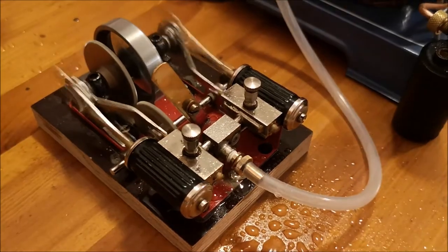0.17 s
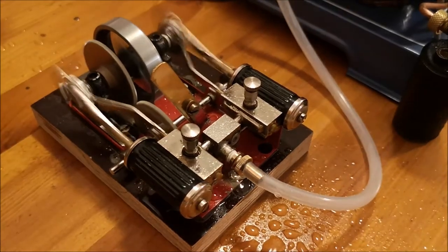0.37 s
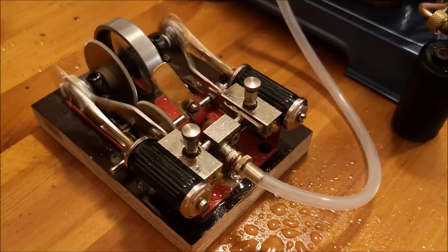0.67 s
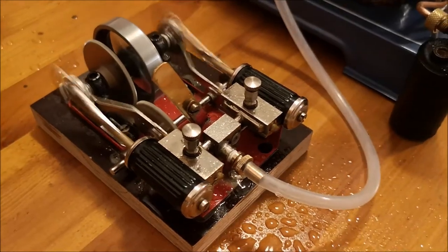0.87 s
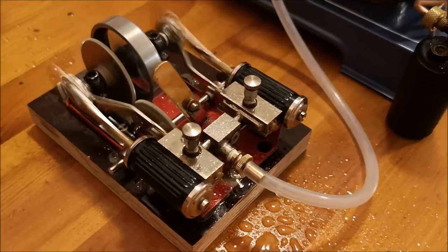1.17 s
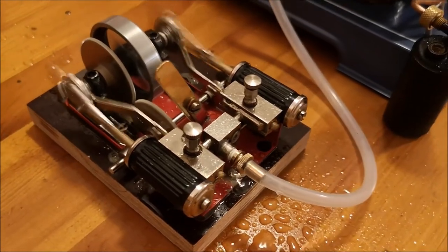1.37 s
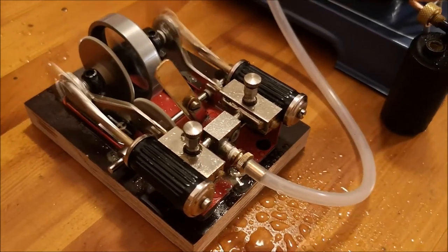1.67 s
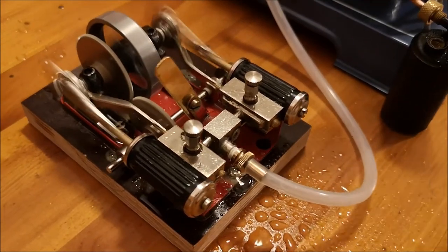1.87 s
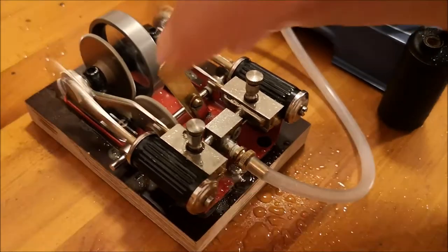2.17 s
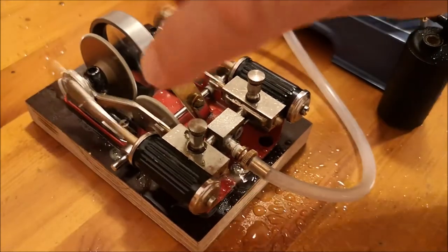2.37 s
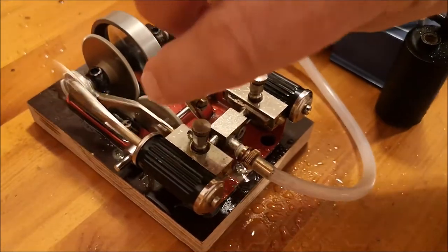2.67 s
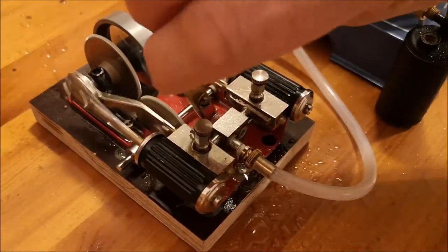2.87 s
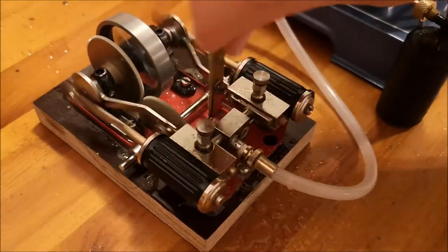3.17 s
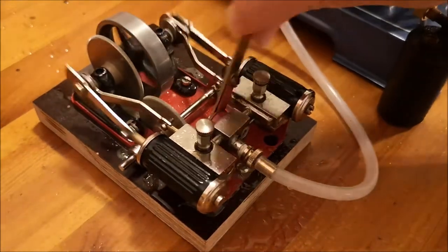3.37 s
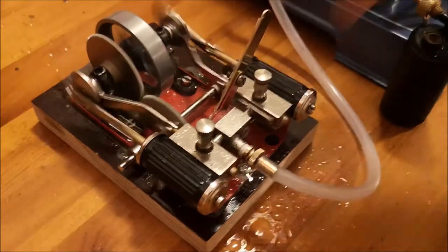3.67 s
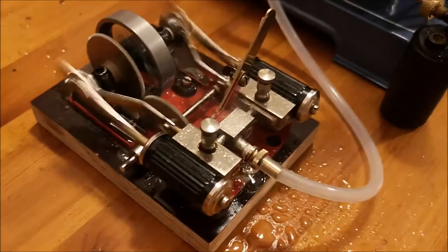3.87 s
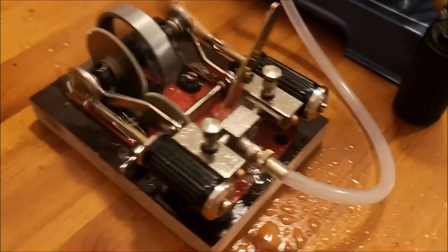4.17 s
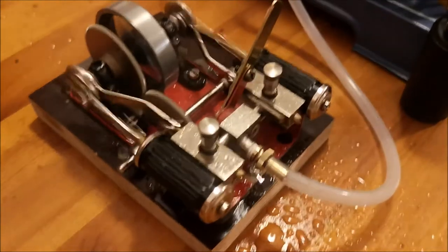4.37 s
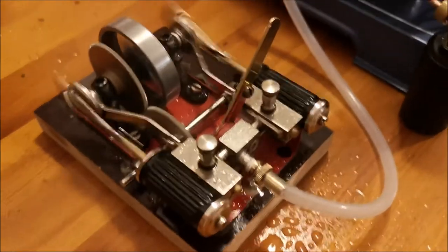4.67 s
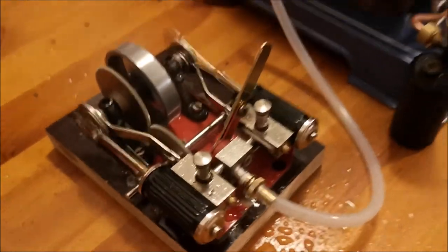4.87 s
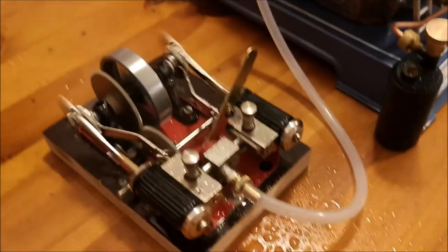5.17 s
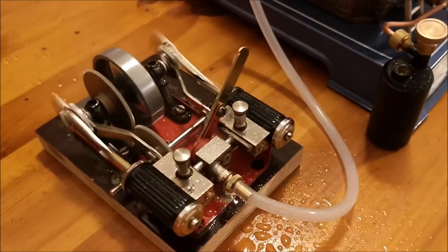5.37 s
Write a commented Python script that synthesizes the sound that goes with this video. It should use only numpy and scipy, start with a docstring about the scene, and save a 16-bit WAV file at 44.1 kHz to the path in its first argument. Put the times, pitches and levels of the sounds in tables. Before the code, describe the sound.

Close by and to the left, a miniature steam engine chatters in a quick rhythm of hollow knocks and ticking rods over a thin, fluttering hiss. The hiss drops away and the beat halts briefly, then a surge of steam and crackling spurts of water start a slower, hissier run. The table hums faintly underneath in a small room, and the hand-held microphone picks up a little rumble and a few dull bumps.

```python
"""On a wooden table in a small room, a twin-cylinder model steam engine runs close to the left of a
hand-held camera. Four times a turn the pistons knock, the loose rods tick, and the valves chop the
hiss of wet, leaking steam. The reversing lever is pulled: the steam is shut off, the engine stalls,
then splutters and runs backwards, slower and hissier. Underneath, the shaken table hums, and handling
of the camera adds rumble and a few soft bumps."""
import sys
import numpy as np
from scipy import signal
from scipy.fft import rfft, irfft
from scipy.io import wavfile
from scipy.ndimage import uniform_filter1d

SR = 44100
rng = np.random.default_rng(int(sys.argv[2]) if len(sys.argv) > 2 else 0)


def int16_out(signal):
    """Quantize to a 16-bit WAV file."""
    q = np.round(np.clip(np.atleast_2d(signal).T, -1, 1) * 32767)
    wavfile.write(sys.argv[1], SR, q.astype(np.int16))


N = 243431
TIME = np.arange(N) / SR
FREQS_HZ = np.fft.rfftfreq(N, 1 / SR)


def gain_of(db):
    """Decibels to amplitude."""
    return 10 ** (np.asarray(db) / 20)


def unit_rms(x):
    """Scales to rms 1."""
    return x / np.sqrt(np.mean(x ** 2) + 1e-20)


def automation(rows):
    """One curve per column of a table of breakpoints in time."""
    times_s, *columns = np.transpose(rows)
    return [np.interp(TIME, times_s, column) for column in columns]


def ramp(start_s, seconds):
    """Rises from 0 to 1 in the given time."""
    return np.clip((TIME - start_s) / seconds, 0, 1)


def eq_curve(points):
    """Joins breakpoints along a log-frequency axis."""
    hz, values = np.transpose(points)
    return np.interp(np.log(FREQS_HZ + 1), np.log(hz + 1), values)


def coloured(x, eq):
    """Filters by an EQ curve in dB, to rms 1."""
    return unit_rms(irfft(rfft(x) * gain_of(eq_curve(eq)), N))


def wander(hz):
    """Random drift of rms 1, up to about hz."""
    return unit_rms(irfft(rfft(rng.standard_normal(N)) * np.exp(-(FREQS_HZ / hz) ** 2), N))


def by_direction(pair, reverse):
    """Crossfades from a forward to a reverse value with the lever."""
    return pair[0] + reverse * (pair[1] - pair[0])


# tone of the handling rumble: freq_hz, gain_db
RUMBLE_EQ = [(5, -2.5), (20, -1), (36, 2.5), (55, -8), (80, -12.5), (110, -26.5), (160, -37.5),
             (300, -42.5), (800, -66)]
# rumble from the unsteady hand: time_s, level_db
RUMBLE_LEVEL = [(0, -43.5), (1.0, -38.5), (1.8, -36), (2.5, -44.5), (3.25, -34.5), (3.65, -44.5),
                (4.0, -31.5), (5.15, -31.5), (5.5, -33.5)]
# bumps on the camera: centre_s, level_db, pitch_hz, tilt_db_per_octave
CAMERA_BUMPS = [(0.132, -29.5, 71, -25), (1.411, -29, 66, -31), (1.842, -17, 56, -21),
                (2.096, -20, 54, -22), (2.886, -19, 57, -28), (3.282, -30, 59, -7.5),
                (3.841, -17.5, 14, -24), (3.872, -16, 58.4, -2.5), (4.484, -14, 61, -19),
                (4.537, -18.5, 55, -19), (4.65, -20.5, 47, -23), (4.761, -20.5, 30, -4.5),
                (5.144, -19.5, 40, -25)]


def handling():
    """The hand rumbles; bumps swing the camera for a cycle or two, hard ones reaching two octaves up."""
    out = coloured(rng.standard_normal(N), RUMBLE_EQ) * gain_of(automation(RUMBLE_LEVEL)[0])
    for centre_s, level_db, pitch_hz, tilt_db in CAMERA_BUMPS:
        for octave in range(3):
            cycles = (TIME - centre_s) * pitch_hz * 2 ** octave
            near = abs(cycles) < 3
            swing = np.cos(2 * np.pi * cycles[near] + octave * np.pi / 2)
            envelope = np.exp(-(cycles[near] / 0.56) ** 2)
            out[near] -= gain_of(level_db + octave * tilt_db) * swing * envelope
    return out


def room(x, t60_s):
    """Sparse reflections from the table top and a small room."""
    t = np.arange(SR // 3) / SR
    taps = rng.choice([-1, 1], len(t)) * (rng.random(len(t)) < 2000 / SR)  # 2000 echoes a second
    taps = taps * (t > .002) * gain_of(-60 * t / t60_s)
    return signal.oaconvolve(x, taps / np.linalg.norm(taps))[:N]


# tone of the shaded right microphone against the left: freq_hz, gain_db
SHADOW_EQ = [(100, 3), (300, 3), (600, -8), (1000, -10), (2000, -11), (4000, -18.5), (7000, -20.5),
             (9300, -18.5), (12000, -20), (15000, -19)]
# how much reaches it directly: freq_hz, amplitude_share
DIRECT_SHARE = [(150, 0.65), (600, 0.92), (1000, 0.39), (4000, 0.27), (12000, 0.065)]


def far_microphone(x, lag_s, twist_rad):
    """The right microphone gets the engine later, shaded and more diffuse."""
    share = np.clip(eq_curve(DIRECT_SHARE), 0, 1)
    midrange = np.exp(-np.log((FREQS_HZ + 1) / 650) ** 2 / 0.57)
    phase = 2 * np.pi * FREQS_HZ * lag_s + twist_rad * midrange
    direct = share * np.exp(-1j * phase) * rfft(x)
    diffuse = np.sqrt(1 - share ** 2) * rfft(room(x, t60_s=0.074))
    return irfft((direct + diffuse) * gain_of(eq_curve(SHADOW_EQ)), N)


# the lever shuts the steam port, passes dead centre, and opens the reverse port
SHUT_AT_S, SHUT_S, OPEN_AT_S, OPEN_S = 3.105, .19, 3.452, .066


def cylinder_pressure_db(drain_db_per_s=48.5):
    """The cylinders drain while the port is shut, and fill again once it is open."""
    drained_s = np.clip(TIME, SHUT_AT_S, OPEN_AT_S) - SHUT_AT_S
    refill = ramp(start_s=3.505, seconds=0.075)
    return -drain_db_per_s * drained_s * (1 - refill)


# humming resonances of the table: stroke_harmonic, resonance_hz, width_hz, level_db
HUM_RESONANCES = [(7, 166.5, 9, -51), (12, 267, 16, -51), (15, 344, 36, -48.5), (18, 423, 40, -60),
                  (42, 1000, 40, -61), (43, 1012, 40, -63)]


def table_hum(strokes):
    """The swinging rods shake the table; harmonics of the stroke rate sing out near its resonances."""
    rate_hz = uniform_filter1d(np.gradient(strokes), size=8000) * SR  # the flywheel evens out the speed
    smooth_strokes = rate_hz.cumsum() / SR
    out = np.zeros(N)
    for harmonic, resonance_hz, width_hz, level_db in HUM_RESONANCES:
        detuning = 2 * (harmonic * rate_hz - resonance_hz) / width_hz
        level = gain_of(level_db + 1.2 * wander(12)) / (1 + detuning ** 2)
        phase = 2 * np.pi * (harmonic * smooth_strokes + rng.random()) + 0.16 * wander(10)
        out += level * np.sin(phase)
    return out * gain_of(cylinder_pressure_db())


def wet_steam(eq, drops_per_s, drops_db, patchy_db):
    """Turbulent noise with drifting patches, and the spit of tiny droplets."""
    drops = rng.random(N) < drops_per_s / SR
    sizes_db = 3.4 * np.minimum(rng.exponential(1, N), 4.5)
    spit = unit_rms(drops * gain_of(sizes_db) * rng.choice([-1, 1], N))
    spectrogram = signal.stft(rng.standard_normal(N) + gain_of(drops_db) * spit, nperseg=256)[2]
    patches = uniform_filter1d(rng.standard_normal(spectrogram.shape), size=9, axis=0)
    patches = unit_rms(uniform_filter1d(patches, size=14, axis=1))
    hiss = signal.istft(spectrogram * gain_of(patchy_db * patches), nperseg=256)[1][:N]
    return coloured(hiss, eq)


# spurts of water as the engine restarts: centre_s, level_db, half_length_s
SPURTS = [(3.558, -38, .012), (3.618, -35, 0.028), (3.685, -38.5, .018), (3.737, -32, 0.026),
          (3.796, -34.5, .015), (3.828, -40, .012)]
# tone of the spurts: freq_hz, gain_db
SPURT_EQ = [(600, -15), (1400, -13), (2000, 2), (2600, -3), (3400, -8), (4200, -5.5), (4900, 2), (6200, -6),
            (10000, -14)]


def splutter():
    """Water condensed in the cylinders is blown out in crackling spurts."""
    level = sum(gain_of(level_db) * np.exp(-((TIME - centre_s) / half_length_s) ** 2)
                for centre_s, level_db, half_length_s in SPURTS)
    return level * wet_steam(SPURT_EQ, drops_per_s=250, drops_db=-3.5, patchy_db=2.0)


# steam with the port open: time_s, leak_db, fizz_boost_db, exhaust_db
STEAM_LEVELS = [(0, -35.5, -2.5, -40), (1.5, -35, -0.5, -42), (2.6, -37, 0.5, -41.5),
                (3.05, -36.5, -4, -42.5), (3.8, -32, -3.5, -42.5), (4.4, -31, -4, -41.5),
                (5.5, -31, -1, -41.5)]
# valve chop: stroke_share, leak_forward_db, leak_reverse_db, exhaust_forward_db, exhaust_reverse_db
VALVE_CHOP = [(0, 0.5, 1.5, 2, 3.5), (.12, 2.5, 0.7, 0.5, 2), (.25, -1, -0.5, 2.5, 6), (.37, 2, -2, 0, 3.5),
              (.48, 1, 2.5, -0.5, -2), (.56, -4, 0.2, -1, 2.5), (.68, -2.7, 2, -5, 2),
              (.78, 2.4, -1, 4, 3.5), (.88, 3, -7, 0.5, 2.5)]
# thin hiss of the leak running forward: freq_hz, gain_db
LEAK_FORWARD_EQ = [(1500, -16), (3000, -49), (3500, -2), (4200, -14), (5000, -4.5), (7300, 2.5),
                   (8700, 0.5), (9300, 5.5), (9900, -1.5), (10700, 2.5), (12200, -9), (13200, -5.5),
                   (13800, -9), (15200, -17)]
# broader hiss of the leak in reverse: freq_hz, gain_db
LEAK_REVERSE_EQ = [(1500, -26.5), (3000, -9.5), (4300, -7.5), (5350, -3), (5750, 2.5), (6250, -1.5),
                   (7200, 1.5), (9200, 2), (9900, -0.5), (10700, -0.5), (12000, -6), (13000, -3),
                   (13900, -9), (15200, -14)]
# breathy body of the exhaust: freq_hz, gain_db
EXHAUST_EQ = [(100, 1), (220, -7.5), (350, -1.5), (480, -1), (650, 1.5), (1000, -1), (1450, -4.5),
              (1900, -1.5), (2500, -1.5), (3500, -4.5), (5000, -7.5), (9000, -16)]
SHUT_DB, CHOKE_DB, FIZZ_ABOVE_HZ = -20, -6, 10000
SURGE_AT_S, SURGE_HALF_S, SURGE_DB = 3.558, 0.022, 5.5


def steam(strokes, reverse):
    """Leaks follow the port and the exhaust follows the pressure; the valves chop both every stroke."""
    leak_db, fizz_db, exhaust_db = automation(STEAM_LEVELS)
    reopened = ramp(OPEN_AT_S, OPEN_S)
    shut = (1 - (1 - ramp(SHUT_AT_S, SHUT_S)) ** 2) * (1 - reopened)
    # the narrowing jet turns dull before it turns quiet
    choke = ramp(start_s=3.06, seconds=.09) * (1 - reopened)
    # steam dammed up behind the port escapes in one surge
    surge_db = SURGE_DB * np.exp(-((TIME - SURGE_AT_S) / SURGE_HALF_S) ** 2)
    leak_db += SHUT_DB * shut + surge_db + 0.22 * wander(10)
    fizz_db += CHOKE_DB * choke + 0.38 * surge_db + 0.42 * wander(15)

    share, *flows = np.transpose(VALVE_CHOP)
    forward_db, reverse_db, *puffs_db = (np.interp(strokes, share, flow, period=1) for flow in flows)
    forward_hiss = wet_steam(LEAK_FORWARD_EQ, drops_per_s=1900, drops_db=-3.5, patchy_db=1.2)
    forward_hiss *= gain_of(forward_db + 0.88 * wander(79))
    reverse_hiss = wet_steam(LEAK_REVERSE_EQ, drops_per_s=1400, drops_db=-7, patchy_db=0)
    reverse_hiss *= gain_of(reverse_db + 0.95 * wander(44))
    leak = gain_of(leak_db) * (np.sqrt(1 - reverse) * forward_hiss + np.sqrt(reverse) * reverse_hiss)
    fizz = signal.sosfiltfilt(signal.butter(4, FIZZ_ABOVE_HZ, "high", fs=SR, output="sos"), leak)
    leak += fizz * (gain_of(fizz_db + 1.03 * wander(36)) - 1)

    exhaust = wet_steam(EXHAUST_EQ, drops_per_s=700, drops_db=-16.5, patchy_db=0.73)
    exhaust_db += cylinder_pressure_db() + by_direction(puffs_db, reverse)
    return leak + exhaust * gain_of(exhaust_db)


def blows(strokes, share, scatter_db, jitter_s):
    """One uneven impulse each time the stroke passes the given share."""
    onsets = np.flatnonzero(np.diff(np.floor(strokes - share)) > 0)
    late, size = rng.standard_normal((128, 2))[:len(onsets)].T
    onsets += (late * jitter_s * SR).astype(int)
    out = np.zeros(N)
    out[np.clip(onsets, 0, N - 1)] = gain_of(scatter_db * np.clip(size, -2, 1.5))
    return out


def chatter(hits, decay_s):
    """Each blow is followed by a dying scrape of the same energy."""
    pole = np.exp(-2 / (decay_s * SR))
    energy = signal.lfilter([1 - pole], [1, -pole], hits ** 2)
    return np.sqrt(energy) * rng.standard_normal(N)


def ring(drive, modes, reverse):
    """Decaying modes of alternating sign, whose balance depends on the running direction."""
    t, out = np.arange(SR // 4) / SR, np.zeros(N)
    for k, (pitch_hz, *gains_db, t60_s) in enumerate(modes):
        mode = (-1) ** k * np.sin(2 * np.pi * pitch_hz * t) * gain_of(-60 * t / t60_s)
        out += signal.oaconvolve(drive * gain_of(by_direction(gains_db, reverse)), mode)[:N]
    return out


# short, bright ring of the rods: pitch_hz, forward_db, reverse_db, t60_s
ROD_MODES = [(2860, -10, -0.5, 0.012), (3430, -1, 5, 0.0067), (3777, -4.5, 4.5, 0.006),
             (4720, -6, -1, 0.0071), (5570, -8, 5.5, 0.0076), (7640, -9, -4, 0.0009)]
# where the slack in the rods ticks: stroke_share, forward_db, reverse_db
ROD_PLAY = [(.02, 4.5, 4.5), (0.199, -12, 0.5), (0.679, 5, -4.5), (.88, -3.5, 0.5)]
# the hardest clacks: start_s, strength_db
ROD_CLACKS = [(0.0554, -22), (0.367, -20), (0.937, -20), (1.6427, -20), (1.6986, -24), (2.0672, -20),
              (2.6305, -19.5), (2.716, -21), (3, -22), (3.1044, -16), (3.1875, -26.5), (4.496, -25),
              (4.5588, -23)]
TICK_FORWARD_DB, TICK_REVERSE_DB, TICK_FADE_DB_PER_S = -41.5, -43.5, 1.22


def rod_ticks(strokes, reverse):
    """Loose rod ends tick as the load changes sides; now and then one clacks hard."""
    hits = np.zeros(N)
    for share, *play_db in ROD_PLAY:
        strength = gain_of(by_direction(play_db, reverse))
        hits += strength * blows(strokes, share, scatter_db=3.5, jitter_s=0.00056)
    ticks = unit_rms(ring(hits + .5 * chatter(hits, decay_s=0.0027), ROD_MODES, reverse))
    ticks_db = by_direction((TICK_FORWARD_DB, TICK_REVERSE_DB), reverse)
    ticks_db += cylinder_pressure_db() - TICK_FADE_DB_PER_S * TIME
    hard_hits = np.zeros(N)
    for start_s, strength_db in ROD_CLACKS:
        hard_hits[round(start_s * SR)] = gain_of(strength_db)
    clacks = ring(hard_hits + 0.33 * chatter(hard_hits, decay_s=0.0019), ROD_MODES, reverse)
    return gain_of(ticks_db) * ticks + gain_of(-4.5) * clacks


# weight of the knocks at full steam: time_s, level_db
KNOCK_FORCE = [(0, -53.5), (.95, -49.5), (2.18, -45.5), (2.66, -42.5), (2.84, -42.5), (3.05, -46.5),
               (3.6, -49), (3.92, -52.5), (4.06, -42.5), (4.8, -44.5), (5.52, -46.5)]
# clank of the base plate: pitch_hz, forward_db, reverse_db, t60_s
BASE_MODES = [(585, -6, -9, 0.05), (641, 2, -0.5, 0.05), (719, 1, -2, 0.048), (820, -9, -5, 0.058),
              (935, -30, -10, 0.13), (1005, -21, -16, 0.1), (1197, -24, -4, 0.034), (1385, -18, -13, 0.14),
              (1537, -17, -30, 0.17), (1927, -14, -14, 0.031)]
# deep, hollow ring of the base: pitch_hz, forward_db, reverse_db, t60_s
HOLLOW_MODES = [(599, 0, -11.5, 0.075), (699.5, -6.5, -2, 0.071)]
# wooden thud of the table: pitch_hz, forward_db, reverse_db, t60_s
TABLE_MODES = [(154.3, -13, 15, 0.089), (268, -10.5, -24, 0.19), (373, -2.5, 6, 0.14), (411, -2, -16, 0.17),
               (505, -11, -6, .08)]
# tone of a chuff: freq_hz, gain_db
CHUFF_EQ = [(130, -2), (450, -14), (600, 2), (740, 5), (900, -9), (1250, -2), (1500, -18.5), (2100, -2.5),
            (3000, -17.5)]
CHUFF_FORWARD_DB, CHUFF_REVERSE_DB = -5, 0  # against the clank
# the hollow ring belongs to forward running, and grows faster than the force does
HOLLOW_DB, HOLLOW_GROWTH, USUAL_FORCE_DB = -47.5, 1.84, -46.5


def piston_knocks(strokes, reverse):
    """Each piston reversal thuds into the base, rebounds, shakes the table and chuffs out spent steam."""
    hits = blows(strokes, share=0, scatter_db=1.45, jitter_s=.0001)
    rebound = blows(strokes, share=0.17, scatter_db=0.5, jitter_s=0.00055) * (0.16 + 0.11 * reverse)
    scrape = (0.58 + 0.28 * reverse) * chatter(hits + rebound, decay_s=0.011)
    clank = unit_rms(ring(hits + rebound + scrape, BASE_MODES, reverse))
    thud = gain_of(-10.5) * unit_rms(ring(hits + scrape, TABLE_MODES, reverse))
    hollow = unit_rms(ring(hits + 0.062 * scrape, HOLLOW_MODES, reverse)) * (1 - reverse)
    chuff = coloured(chatter(hits + rebound, decay_s=0.038), CHUFF_EQ)
    chuff *= gain_of(by_direction((CHUFF_FORWARD_DB, CHUFF_REVERSE_DB), reverse))
    force_db = automation(KNOCK_FORCE)[0] + 0.51 * cylinder_pressure_db()
    hollow_db = HOLLOW_DB + HOLLOW_GROWTH * (force_db - USUAL_FORCE_DB)
    return gain_of(force_db) * (clank + chuff + thud) + gain_of(hollow_db) * hollow


# crank travel, whichever way it spins: time_s, travel_turns
CRANK_TRAVEL = [(0, -.13), (.383, 2), (.726, 4), (2.588, 15), (3.275, 19), (3.552, 19.25), (3.615, 19.5),
                (3.895, 20.5), (4.167, 21.5), (4.433, 22.5), (4.688, 23.5), (5.199, 25.5), (5.53, 26.76)]
# reversing lever, from 0 forward to 1 reverse: time_s, reverse_share
LEVER_THROW = [(3.3, 0.088), (3.47, 0.84)]
STROKES_PER_TURN = 4


def scene():
    """The crank sets the rhythm of the engine; the handling reaches both microphones alike."""
    strokes = STROKES_PER_TURN * automation(CRANK_TRAVEL)[0]
    reverse = np.clip(automation(LEVER_THROW)[0], 0, 1)
    engine = steam(strokes, reverse) + splutter()
    engine += piston_knocks(strokes, reverse) + rod_ticks(strokes, reverse) + table_hum(strokes)
    left = engine + gain_of(-13.5) * room(engine, t60_s=0.09)
    right = far_microphone(engine, lag_s=26 / SR, twist_rad=.8)
    return np.array([left, right]) + handling()


def record(dry, cutoff_hz=15250):
    """The recorder's band limit cuts the highest treble steeply."""
    lowpass = signal.firwin(511, cutoff_hz, window=("kaiser", 9), fs=SR)
    return signal.oaconvolve(dry, lowpass[None], "same")


dry = scene()
out = record(dry)
int16_out(out)
```